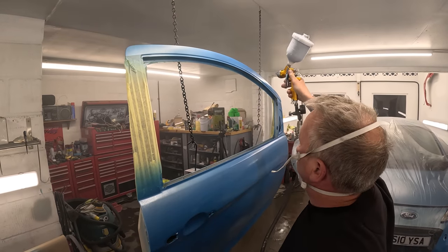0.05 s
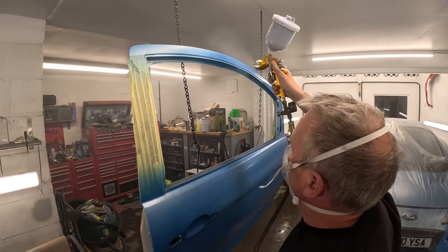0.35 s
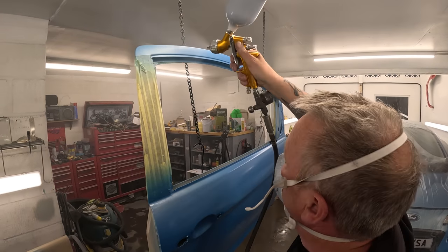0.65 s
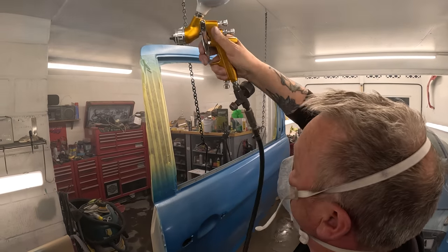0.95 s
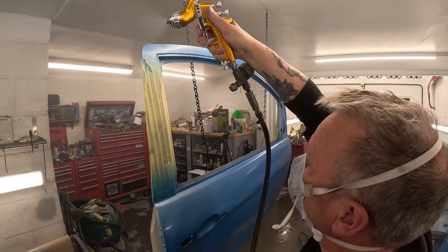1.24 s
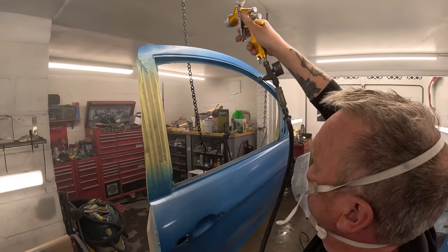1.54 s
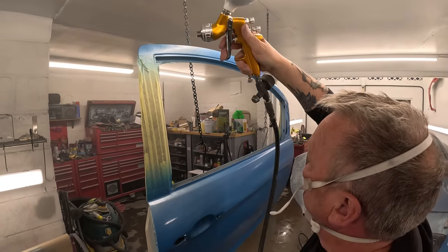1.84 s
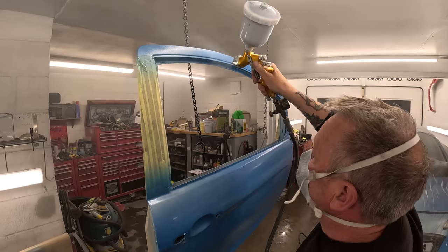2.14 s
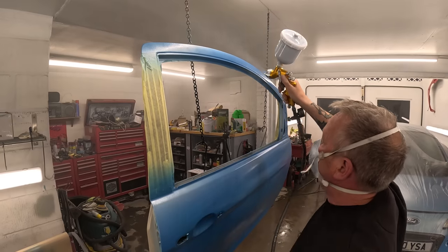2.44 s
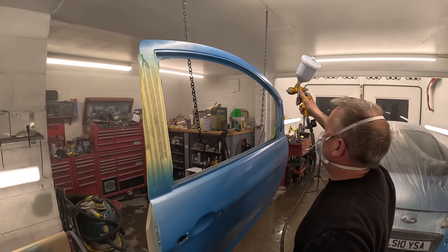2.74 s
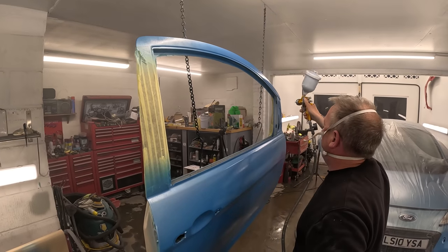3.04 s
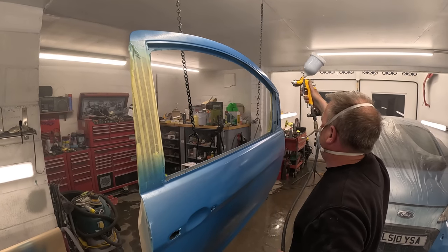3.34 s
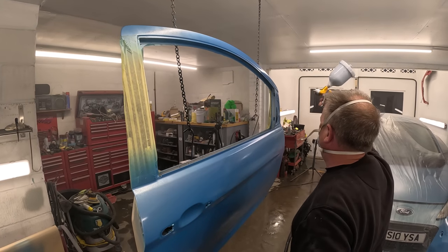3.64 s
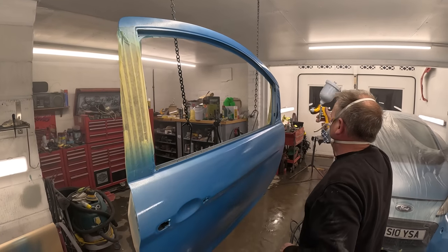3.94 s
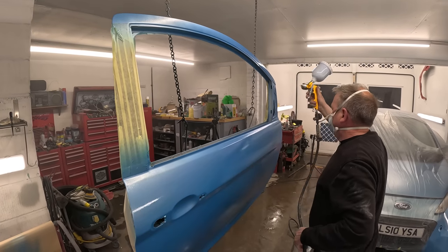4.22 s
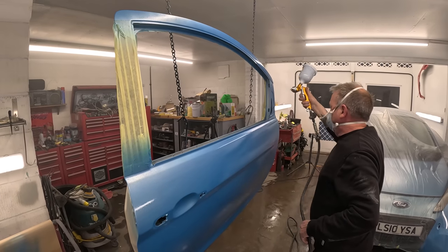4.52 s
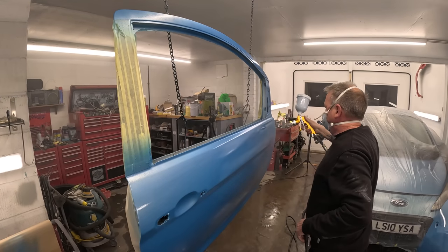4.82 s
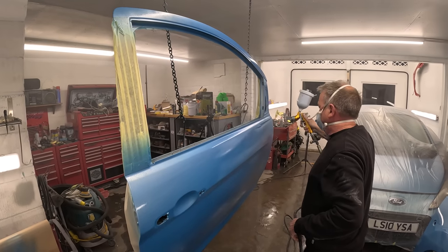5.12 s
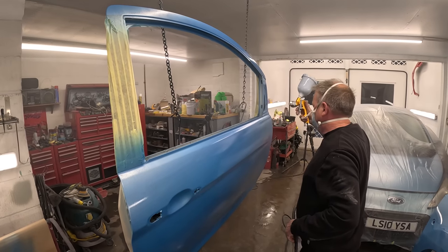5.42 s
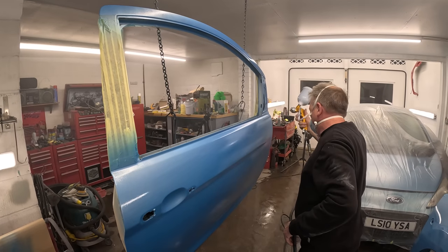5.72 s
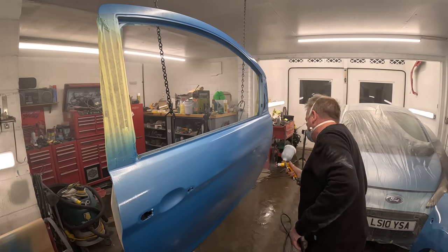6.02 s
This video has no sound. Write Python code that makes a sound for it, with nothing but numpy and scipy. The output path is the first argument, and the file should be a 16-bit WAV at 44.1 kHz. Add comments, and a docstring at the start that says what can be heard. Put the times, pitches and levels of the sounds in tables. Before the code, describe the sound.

Bright, airy hisses from a paint sprayer start and stop, growing shorter, while ventilation hums steadily underneath.

```python
"""In a small, hard-walled workshop, a gravity-fed spray gun paints a hanging car door.
Each pull of the trigger lets out a bright jet of air, a fine sizzle of paint and a lower rush on the door.
Extractor machinery drones throughout: its fan stirs the duct, and its blades and motor hum.
Now and then the jet catches an edge and puffs. The hiss rings briefly in the room."""
import sys
import numpy as np
from scipy import signal
from scipy.fft import rfft, irfft, next_fast_len
from scipy.io import wavfile
from scipy.ndimage import uniform_filter1d

SR = 44100
rng = np.random.default_rng(int(sys.argv[2]) if len(sys.argv) > 2 else 0)


def store_pcm(level_fs):
    """Save levels as 16-bit WAV."""
    pcm = np.round(np.clip(level_fs, -1, 1) * 32767).astype(np.int16)
    wavfile.write(sys.argv[1], SR, np.atleast_2d(pcm).T)


N = 272097
TIME = np.arange(N) / SR
STEP = 32   # samples per tick; slow changes are worked out once a tick
TICKS = TIME[::STEP]
BIN_HZ = np.maximum(np.fft.rfftfreq(N, 1 / SR), 1)
BAND_HZ = np.concatenate([np.geomspace(200, 7100, 16), np.linspace(8000, 16000, 11)])


def from_db(db):
    """Turns decibels into a gain."""
    return 10 ** (np.asarray(db) / 20)


def at_samples(per_tick):
    """Fills in the samples between ticks."""
    return np.interp(TIME, TICKS, per_tick)


def at_hz(rows, hz):
    """Reads between a table's rows on a log frequency scale."""
    row_hz, values = np.transpose(rows)
    return np.interp(np.log(hz), np.log(row_hz), values)


def colour(spectrum):
    """The share of a sound's power per Hz in each band, as a column."""
    density = from_db(at_hz(spectrum, BAND_HZ)) ** 2
    return (density / np.sum(density * np.gradient(BAND_HZ)))[:, None]


def noise(gain):
    """Steady noise, shaped by a gain for each frequency."""
    return irfft(rfft(rng.standard_normal(N)) * gain, N) * np.sqrt(SR / 2)


def drift(rate_hz):
    """A slow random wander around 0, with a spread of 1."""
    wander = noise(1 / (1 + (BIN_HZ / rate_hz) ** 2))
    return (wander - wander.mean()) / wander.std()


def turbulence(power):
    """Churning air: turns a power for each band and tick into noise you can hear."""
    size = next_fast_len(N, True)
    hz = np.fft.rfftfreq(size, 1 / SR)
    white = rfft(rng.standard_normal((2, size))) * np.sqrt(SR / 2)
    out = 0
    for k, weights in enumerate(np.eye(len(BAND_HZ))):
        shape = np.sqrt(np.interp(hz, BAND_HZ, weights, 0, 0))
        band = irfft(white[k % 2] * shape, size)[:N]   # neighbouring bands get unrelated noise
        out = out + at_samples(np.sqrt(power[k])) * band
    return out


# The gun's path. Each row: time in seconds, distance from the listener in metres.
GUN_PATH = [(0, 1.03), (0.7, 0.68), (1.6, 0.68), (2.6, 1.315), (6.17, 2.03)]

def gun_distance():
    """Metres to the gun at each tick: it comes along the window frame's top, then down the far side."""
    return np.interp(TICKS, *np.transpose(GUN_PATH))


# Pulls of the trigger. Each row: start in seconds, start of closing in seconds, closing time in seconds,
# opening surge in dB, base level of the jet in dB, base level of the rush on the door in dB.
TRIGGER_PULLS = [(-0.3, 0.104, 0.039, -6, -24, -40), (0.363, 1.078, 0.0045, -1, -23, -38.5),
                 (1.284, 1.525, 0.021, 3.5, -23.5, -43), (1.987, 3.126, 0.065, 5.5, -22.5, -38.5),
                 (3.291, 3.462, 0.012, 0, -23.5, -37.5), (4.527, 4.926, 0.055, 3, -22.5, -41),
                 (5.19, 5.426, 0.012, 1, -23, -40.5), (5.827, 6.3, 0.03, 3, -23.5, -41)]

def spray_gun(opening_s=0.0075, surge_s=0.089, sag_db_per_s=2.6, first_spit_db=2.5, spit_s=0.03):
    """Stored hose pressure snaps the air on, then sags. Gives the spray's power in each band."""
    flow, jet_db, rush_db, spit_db = np.zeros((4, len(TICKS)))
    for opens, closes, closing_s, surge_db, pull_db, door_db in TRIGGER_PULLS:
        held_s = np.maximum(TICKS - opens, 0)
        opening = np.clip((TICKS - opens) / opening_s + .5, 0, 1)
        valve = opening * np.clip(1 - (TICKS - closes) / closing_s, 0, 1)
        flow += valve * from_db(surge_db * np.exp(-held_s / surge_s) - sag_db_per_s * held_s)
        on = valve > 0
        jet_db[on] = pull_db
        # each pull is one sweep, full on the door midway and weaker at both ends
        off_centre = 2 * np.minimum(held_s[on] / (closes - opens), 1) - 1
        rush_db[on] = door_db - 4.5 * off_centre ** 2
        # paint gathered on the nozzle spits as the air starts
        spit_db[on] = first_spit_db * np.exp(-held_s[on] / spit_s)
    doublings = np.log2(gun_distance())   # 0 at one metre, 1 at two metres
    jet_db -= 1.5 * doublings
    jet = air_jet(flow, jet_db, doublings)
    sizzle = paint_sizzle(flow, jet_db + spit_db, doublings)
    return jet + sizzle + door_rush(flow, rush_db)


# The jet's bright colour. Each row: frequency in Hz, relative level in dB.
JET_COLOUR = [(600, -31), (1300, -13), (2000, -7), (2800, -2.5), (3700, 0), (5500, 1), (7100, -1),
              (8000, -7.5), (9000, -9.5), (11000, -19), (15000, -32.5)]

def air_jet(flow, level_db, doublings, wrist_hz=5.0, pivot_hz=4800):
    """The nozzle beams its treble, so the hiss changes colour as the gun moves and the wrist rocks."""
    tilt_db_per_octave = 0.5 * doublings + 0.6 * drift(wrist_hz)[::STEP]
    octaves = np.clip(np.log2(BAND_HZ / pivot_hz), -1, 1)[:, None]
    return (flow * from_db(level_db + tilt_db_per_octave * octaves)) ** 2 * colour(JET_COLOUR)


# The sizzle's very high colour. Each row: frequency in Hz, relative level in dB.
SIZZLE_COLOUR = [(6000, -29), (8500, -10), (9600, 7.5), (11200, 3), (12200, -13), (13500, -7), (14700, -14),
                 (15300, -27), (16000, -31)]

def paint_sizzle(flow, level_db, doublings, offset_db=-15.5):
    """Paint breaks into mist. Its sizzle grows faster than the flow and gains on the jet with distance."""
    strength = flow ** 1.06 * from_db(level_db + offset_db + 1.2 * doublings)
    return strength ** 2 * colour(SIZZLE_COLOUR)


# The rush's lower colour. Each row: frequency in Hz, relative level in dB.
RUSH_COLOUR = [(200, -14), (450, 9.5), (700, 4.5), (1100, 6.5), (1700, 3.5), (2600, 1), (5000, -28)]

def door_rush(flow, level_db):
    """The fan of paint rushes where it meets the door."""
    return (flow * from_db(level_db)) ** 2 * colour(RUSH_COLOUR)


# Where the duct and room ring. Each row: pitch in Hz, rough width in Hz, base level in dB.
DUCT_RESONANCES = [(133.4, 21, -58.5), (140.5, 7, -47.5), (175.7, 22.4, -57), (216, 15, -60),
                   (245.6, 26, -58.5), (290, 33, -57.5), (294, 13.5, -51.5), (312, 25, -61),
                   (355, 11.5, -63.5), (391.4, 20, -64.5), (412.3, 14, -58), (591.5, 34, -70.5)]

def duct_boom():
    """Churning air from the fan stirs the low resonances of the duct and room."""
    power = 0
    for hz, width, db in DUCT_RESONANCES:
        off_pitch = (BIN_HZ - hz) / (width * 0.66)
        power = power + (from_db(db) / (1 + off_pitch ** 2) ** 1.41) ** 2
    return noise(np.sqrt(power))


# The hum of the fan and of the motor. Each row: cycles per turn of the shaft, base level in dB.
FAN_TONES = [(3, -49.5), (6, -37.5), (18, -65)]
MOTOR_TONES = [(2, -58.5), (9, -73), (14, -60), (15, -63.5), (17, -65), (18, -62)]

def shaft_hum(tones, shaft_hz, waver_db, wander):
    """Tones follow a spinning shaft whose speed wanders slightly; each one wavers in level."""
    angle = 2 * np.pi * np.cumsum(shaft_hz * (1 + wander * drift(0.54))) / SR
    hum = 0
    for cycles, db in tones:
        strength = np.sqrt(2) * from_db(db + waver_db * drift(16.0))
        hum = hum + strength * np.sin(round(cycles) * angle + rng.uniform(0, 2 * np.pi))
    return hum


# Air moving in the duct. Each row: frequency in Hz, base level in dB.
DUCT_AIR_COLOUR = [(20, -86), (55, -83.5), (75, -78.5), (110, -67), (350, -69), (650, -77), (900, -77),
                   (1400, -85), (2400, -86), (3200, -86.5), (4100, -95.5), (7000, -106), (11500, -118),
                   (15000, -138)]
# How the drone swells and eases. Each row: time in seconds, boost in dB.
DRONE_SWELL = [(0, 1.2), (1.4, 2.2), (2.5, 3.5), (3.1, 4), (3.8, 2), (4.45, 5), (4.85, 2.5), (6.17, 2)]

def extractor(air_follow=0.27):
    """The boom and hum swell together; the duct's airy noise follows them only a little."""
    swell_db = at_samples(np.interp(TICKS, *np.transpose(DRONE_SWELL)))
    boom = duct_boom()
    fan = shaft_hum(FAN_TONES, shaft_hz=47.09, waver_db=3.5, wander=0.0013)
    motor = shaft_hum(MOTOR_TONES, shaft_hz=37.61, waver_db=1.5, wander=0.00068)
    air = noise(from_db(at_hz(DUCT_AIR_COLOUR, BIN_HZ)))
    return from_db(swell_db) * (boom + fan + motor) + from_db(air_follow * swell_db) * air


# The jet catches an edge of the window frame.
# Each row: loudest moment in seconds, spread to either side in seconds, base level in dB.
EDGE_CATCHES = [(0.917, 0.027, -35), (1.45, 0.057, -40), (3.01, 0.04, -45), (3.38, 0.01, -33),
                (4.68, 0.035, -50), (6.01, 0.043, -44)]

def edge_puffs(puff_hz=760, width_hz=520, whistle_hz=3800, whistle_width_hz=450):
    """An edge sheds swirls of air: a hollow puff with a breathy whistle. Gives power in each band."""
    swell = sum(from_db(db) * np.exp(-.5 * ((TICKS - peak_s) / spread_s) ** 2)
                for peak_s, spread_s, db in EDGE_CATCHES)
    hollow = np.minimum(BAND_HZ / puff_hz, 1) / (1 + ((BAND_HZ - puff_hz) / width_hz) ** 2)
    whistle = 1 / (1 + ((BAND_HZ - whistle_hz) / whistle_width_hz) ** 2)
    return swell ** 2 * (hollow ** 2 + whistle ** 2)[:, None] / width_hz


def trigger_leak(start_s=4.499, end_s=4.526, level_db=-57):
    """A little air slips past the half-pressed trigger. Gives power in each band."""
    leaking = (TICKS > start_s) & (TICKS < end_s)
    return from_db(level_db) ** 2 * leaking * (colour(JET_COLOUR) + 0.12 * colour(SIZZLE_COLOUR))


# How long the workshop rings. Each row: frequency in Hz, seconds to fade by 60 dB.
RING_TIMES = [(300, 0.2), (1500, 0.55), (4000, 0.49), (7000, 0.43), (11000, 0.36), (15000, 0.31)]

def workshop_ring(power, room_db_at_1m=-0.7, db_per_doubling=2.2):
    """Each band's energy fills the room and drains away. The nearer the gun, the less room one hears."""
    room_to_direct = from_db(room_db_at_1m + db_per_doubling * np.log2(gun_distance())) ** 2
    room_share = room_to_direct / (1 + room_to_direct)
    kept_per_tick = from_db(-60 * STEP / SR / at_hz(RING_TIMES, BAND_HZ)) ** 2
    ringing = np.array([signal.lfilter([1 - kept], [1, -kept], room_share * band)
                        for kept, band in zip(kept_per_tick, power)])
    return 2 * ((1 - room_share) * power + ringing)


def near_echoes(hiss, door_gain=0.038, lag_s_per_m=0.0011, nearby_gain=0.13, sway_s=0.000404, count=6):
    """The door's echo shifts as the gun moves; arm, head and ceiling add more quick, swaying echoes."""
    door_lag_s = lag_s_per_m * at_samples(gun_distance())
    out = hiss + door_gain * np.interp(TIME - door_lag_s, TIME, hiss)
    for rest_s in rng.uniform(0.0006, 0.006, count):
        lag_s = np.abs(rest_s + sway_s * drift(0.57))
        out = out + nearby_gain * np.interp(TIME - lag_s, TIME, hiss)
    return out / np.sqrt(1 + door_gain ** 2 + count * nearby_gain ** 2)


# How much the microphone's left and right openings differ.
# Each row: frequency in Hz, level of the difference in dB compared with the middle.
STEREO_WIDTH = [(6000, -65), (7500, -30), (10400, -24), (11200, -11), (12000, -2), (15000, 0)]

def scene():
    """Gun and extractor sit in the middle; only the top of the hiss spreads left and right."""
    hiss_power = workshop_ring(spray_gun() + edge_puffs() + trigger_leak())
    middle = near_echoes(turbulence(hiss_power)) + extractor()
    side = turbulence(hiss_power * from_db(at_hz(STEREO_WIDTH, BAND_HZ))[:, None] ** 2)
    return middle + side * np.array([[1], [-1]])


def gain_control(sound, threshold_db=-29.0, squeeze=0.64, release_db_per_s=4.5, window_s=0.019):
    """The volume drops at once when the hiss starts and creeps back up in the pauses."""
    power = uniform_filter1d(np.mean(sound ** 2, axis=0), int(window_s * SR))
    over_db = np.maximum(10 * np.log10(np.maximum(power, 1e-12)) - threshold_db, 0)
    recovery_db = release_db_per_s * TIME
    cut_db = np.maximum.accumulate(squeeze * over_db + recovery_db) - recovery_db
    return sound * from_db(-cut_db)


# Peaks and dips from the microphone's openings. Each row: frequency in Hz, width in Hz, gain in dB.
MIC_PEAKS_AND_DIPS = [(8880, 63, 12), (9000, 290, -19.5), (10400, 470, -6)]

def record(dry, lean_db=1.0, lean_above_hz=11200, cutoff_hz=15400):
    """The microphone notches the treble and is brighter on the right; loud parts dip, the top is cut."""
    mic_db = sum(db / (1 + (2 * (BIN_HZ - hz) / width) ** 2) for hz, width, db in MIC_PEAKS_AND_DIPS)
    balance_db = lean_db * (BIN_HZ > lean_above_hz) * np.array([[-1], [1]])
    coloured = irfft(rfft(dry) * from_db(mic_db + balance_db), N)
    low_pass = signal.ellip(10, .1, 80, cutoff_hz, fs=SR, output="sos")
    return signal.sosfilt(low_pass, gain_control(coloured))


dry = scene()
out = record(dry)
store_pcm(out)
```